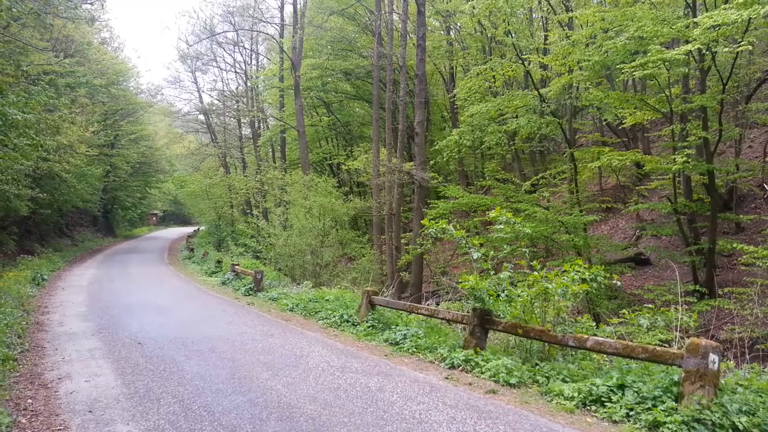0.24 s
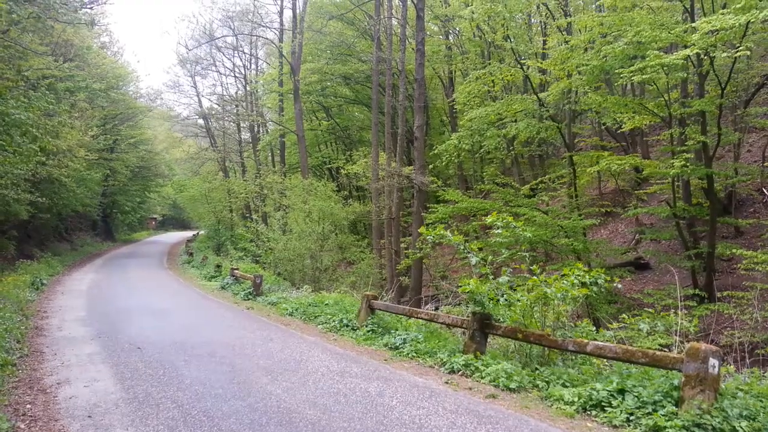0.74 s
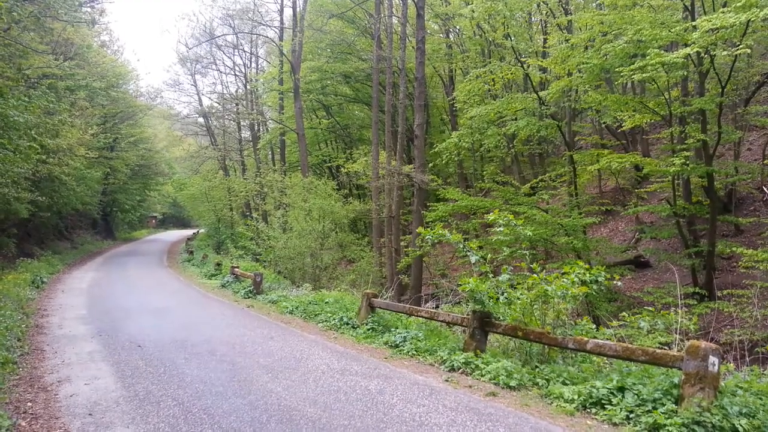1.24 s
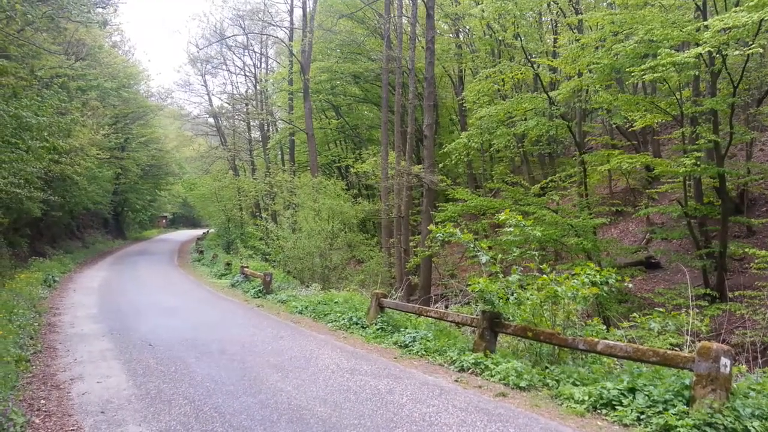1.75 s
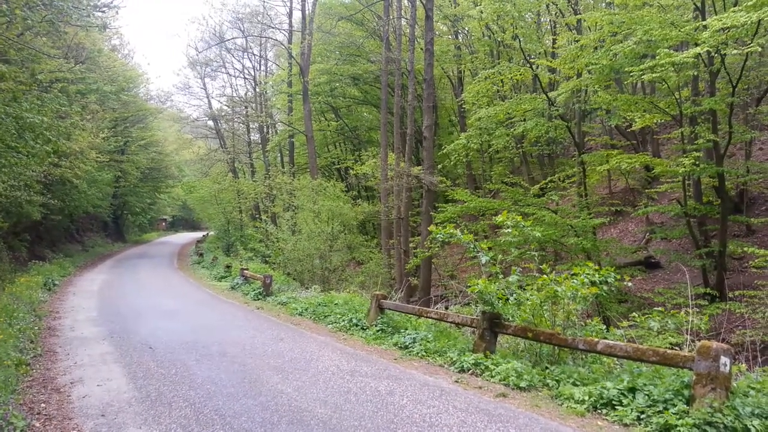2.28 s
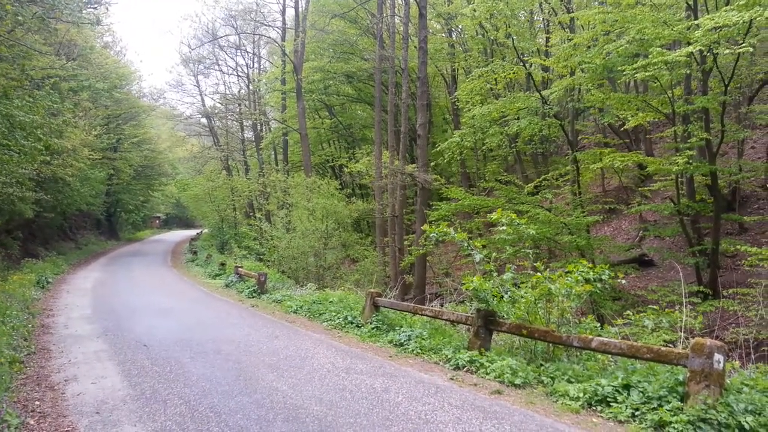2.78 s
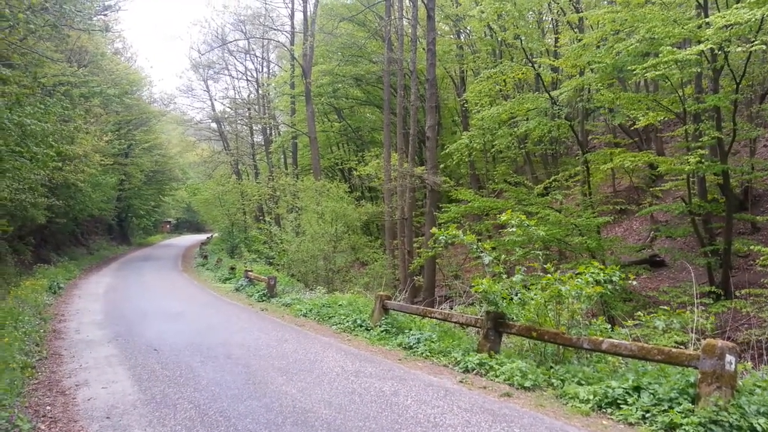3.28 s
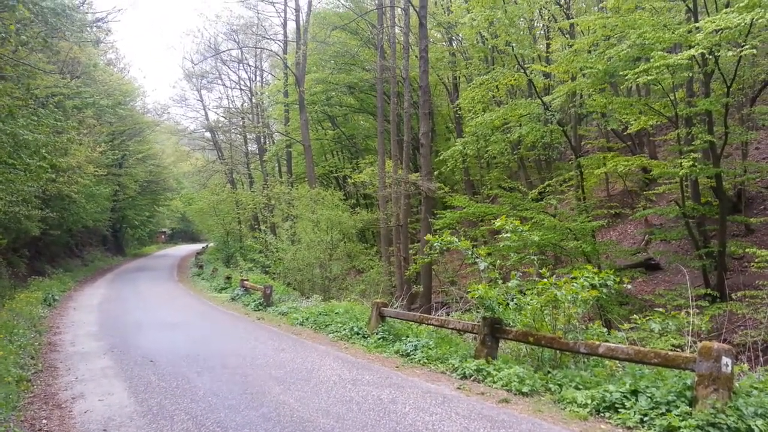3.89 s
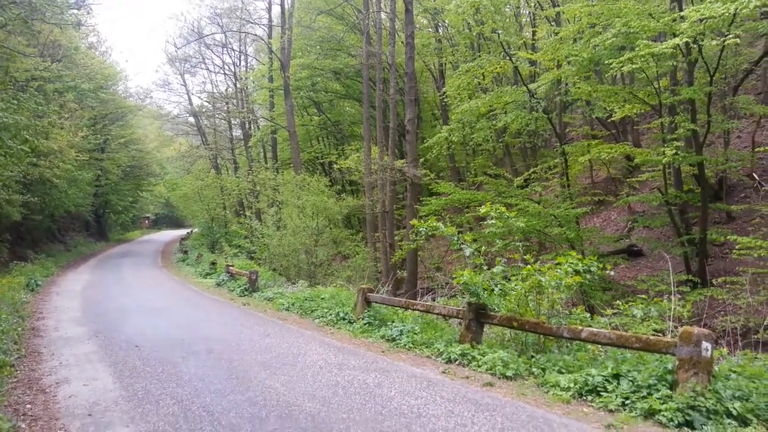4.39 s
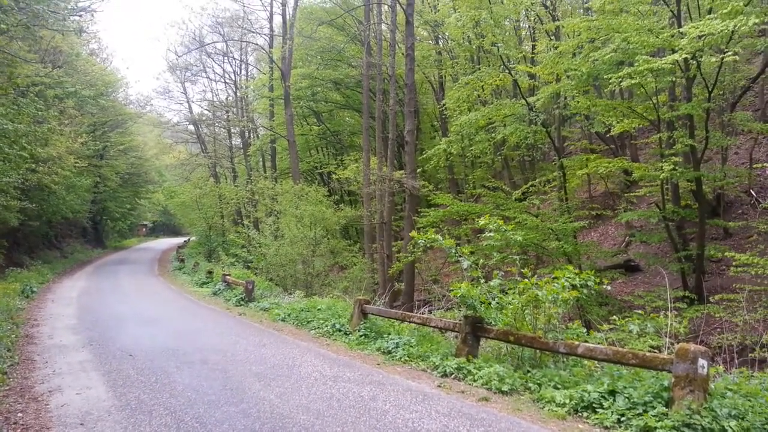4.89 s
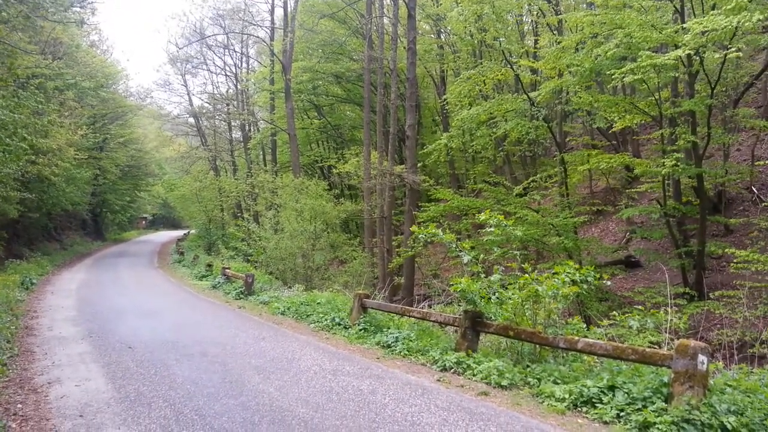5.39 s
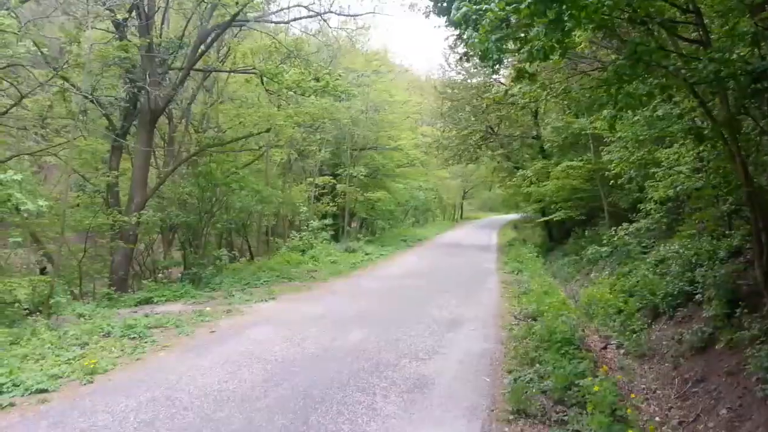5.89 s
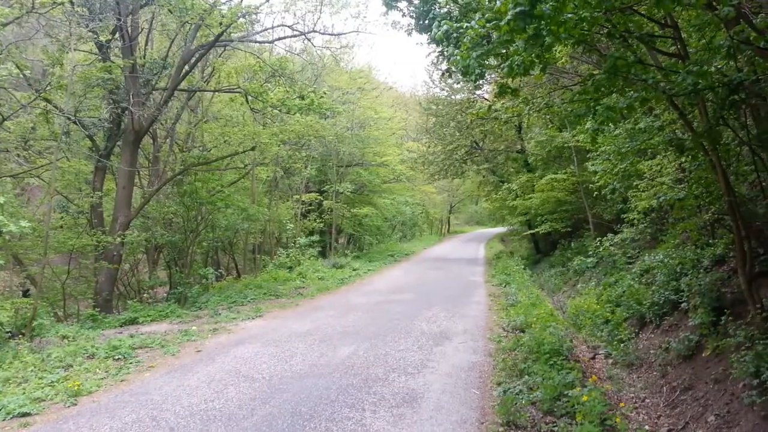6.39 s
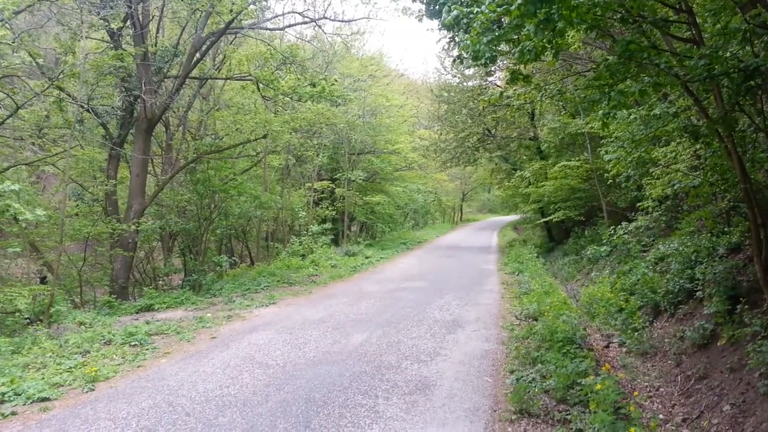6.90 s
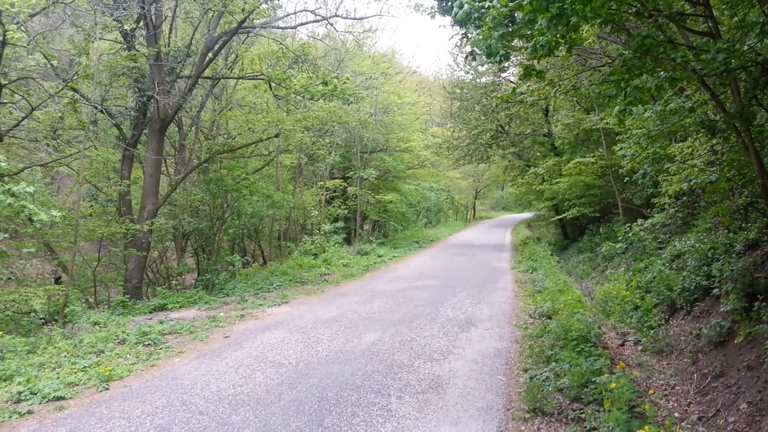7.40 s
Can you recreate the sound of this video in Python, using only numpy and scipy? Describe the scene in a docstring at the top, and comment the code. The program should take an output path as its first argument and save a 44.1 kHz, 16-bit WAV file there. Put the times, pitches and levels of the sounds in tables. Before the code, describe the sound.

Songbirds call in a leafy wood: fluted notes, thin whistles, quick slurs and short buzzes, each echoing off trunks, with distant twittering behind. Low wind buffets a stereo camera microphone, mainly on the right, thumping hardest around 2.4 seconds and puffing again from about 4 to 5.8. A sharp tick clicks at 4.7. Near song cuts off abruptly at 5.8, then sparser calls continue over quiet hiss.

```python
"""Songbirds in spring woodland

Near birds sing fluted notes, thin whistles, slurs, chips and buzzes: gliding tones with echoes off trunks.
Nearer song breaks off at 5.805 s, echoes included; later notes follow. Far twitter is echo alone.
Wind puffs are churning low noise, mostly in the right port; the camera ticks, hisses and whines faintly.
Behind lie soft knocks, a noise murmur of far leaves and a low rumble."""
import sys
import numpy as np
from scipy import signal
from scipy.fft import rfft, irfft, next_fast_len
from scipy.io import wavfile
from scipy.ndimage import uniform_filter1d, map_coordinates

SR = 44100
rng = np.random.default_rng(int(sys.argv[2]) if len(sys.argv) > 2 else 0)


def file_out(sig):
    """Save sig as 16-bit WAV at sys.argv[1]."""
    # one column per channel
    cols = np.atleast_2d(sig).T
    # limit, then scale
    lim = np.clip(cols, -1, 1)
    pcm = np.round(lim * 32767).astype(np.int16)
    wavfile.write(sys.argv[1], SR, pcm)


N = 337365
T = np.arange(N) / SR


# pan_db throughout: left minus right level
def amp(db):
    """Decibels to gain."""
    return 10 ** (np.asarray(db) / 20)


def unit(x):
    """Scale to rms 1."""
    return x / np.sqrt(np.mean(x ** 2) + 1e-20)


def along(points, hz):
    """Interpolate (freq_hz, value) points on a log frequency axis."""
    point_hz, values = np.transpose(points)
    return np.interp(np.log(hz + 1), np.log(point_hz + 1), values)


def curve(rows):
    """Interpolate (time_s, value) rows to one value per sample."""
    time_s, values = np.transpose(rows)
    return np.interp(T, time_s, values)


def wobble(knots_per_s, size=N):
    """Smooth random curve through Gaussian knots."""
    knots = rng.standard_normal(int(size * knots_per_s / SR) + 4)
    return map_coordinates(knots, [np.arange(size) * knots_per_s / SR])


def filtered(x, response):
    """Multiply the spectrum of x by a function of frequency."""
    m = next_fast_len(N + SR // 4)
    spectrum = rfft(x, m) * response(np.fft.rfftfreq(m, 1 / SR))
    return irfft(spectrum, m)[..., :N]


def noise(spectrum):
    """Coloured noise of rms 1."""
    return unit(filtered(rng.standard_normal(N), lambda hz: amp(along(spectrum, hz))))


def rush(spectrum):
    """Stereo coloured noise of rms 1; the channels correlate mainly in the bass."""
    # left-right likeness: freq_hz, correlation
    likeness = [(60, 0.66), (150, 0.59), (380, 0.53), (940, 0.17), (2370, 0.034), (5930, 0.027),
                (14800, 0.03)]

    def mid_side(hz):
        angle_rad = np.arccos(np.clip(along(likeness, hz), -1, 1)) / 2
        return amp(along(spectrum, hz)) * [np.cos(angle_rad), np.sin(angle_rad)]

    mid, side = filtered(rng.standard_normal((2, N)), mid_side)
    return unit(np.array([mid + side, mid - side]))


def panned(pan_db):
    """Left and right gains for a level difference, at constant power."""
    return unit(amp([[pan_db / 2], [-pan_db / 2]]))


def add(track, start_s, sound):
    """Mix a sound into a stereo track."""
    i = max(0, round(start_s * SR))
    track[:, i:i + sound.shape[1]] += sound[:, :N - i]


def birds():
    """Nearer birds; notes begun before the break, and their echoes, fade out there in 3.3 ms."""
    break_s, fade_s = 5.805, 0.0033
    first, second = np.zeros((2, 2, N))
    for start_s, sound in songs():
        add(first if start_s < break_s else second, start_s, sound)
    return first * np.clip((break_s - T) / fade_s, 0, 1) + second


def songs():
    """Every note of the nearer birds; each kind of call has one pitch shape."""
    # level_db is relative; echo_db is against the direct note
    # low notes: start_s, length_s, opening_hz, held_hz, trill_hz, level_db, pan_db, echo_db
    fluted = [(0.412, 0.12, 2060, 2058, 5, -54.5, -3, -1.5), (0.778, 0.1, 2360, 2323, 0, -61, -4, -3),
              (0.825, .06, 2217, 2070, 50, -58, -2, 3), (1.229, 0.15, 2350, 2266, 0, -62, -6, 4),
              (1.3, .18, 2704, 2630, 0, -65, 5, 6), (1.874, .096, 1635, 1700, 5, -56, 9, -3),
              (2.08, .082, 2280, 2115, -1, -51, 9, -12), (2.14, .075, 2100, 1953, 0, -47.5, 12, -1),
              (2.221, .079, 2004, 1900, 118, -52.5, 5, -1), (2.358, 0.064, 2800, 2680, -5, -49, 7, -4),
              (2.387, 0.131, 2600, 2570, 142, -48, -0.5, 2), (2.524, 0.083, 1770, 2124, 33, -42.5, -4, 1),
              (2.828, 0.078, 1698, 2494, 190, -54.5, -7, 2), (3.17, 0.092, 2560, 2590, 50, -57, -5, 4),
              (5.52, 0.11, 1753, 1865, 0, -54.5, -19, -1.5), (5.81, 0.054, 2670, 2630, 0, -50, -1.5, -1.5),
              (5.985, 0.047, 2320, 2329, 14, -39.5, 1, -3.5), (6.118, 0.085, 2660, 2610, 20, -57.5, -1, -6)]
    for start_s, length_s, opening_hz, hz, trill_hz, db, pan_db, echo_db in fluted:
        yield sing(start_s, length_s, (opening_hz, hz, hz), db, pan_db, echo_db, trill_hz, settle_s=0.01395)

    # steady whistles, opening 2.5 % flat: start_s, length_s, held_hz, level_db, pan_db
    thin = [(0.111, 0.076, 4300, -56, 1.5), (1.176, .066, 5270, -61, 4), (2.25, 0.17, 5530, -56.5, 0),
            (3.185, 0.076, 6570, -46.5, -19), (3.201, 0.059, 5060, -54, 10), (3.595, .15, 4980, -56.5, 12),
            (6.464, 0.064, 4340, -58, 2), (6.99, 0.21, 3233, -67, -0.5), (7.219, 0.14, 5000, -57.5, 6)]
    for start_s, length_s, hz, db, pan_db in thin:
        yield sing(start_s, length_s, (hz * (1 - 0.025), hz, hz), db, pan_db, echo_db=2)

    # glides up or down: start_s, length_s, from_hz, to_hz, level_db, pan_db
    slurs = [(1.36, 0.11, 8170, 7560, -61.5, -10), (2.722, 0.038, 6700, 4820, -51, -1),
             (2.732, .05, 8260, 3810, -46.5, -7), (2.752, 0.036, 7900, 6060, -48, -12),
             (2.765, .035, 4330, 3850, -49, 10), (3.265, .15, 6770, 7130, -57, -15),
             (3.532, 0.063, 3540, 4930, -54.5, 12), (3.538, .16, 6960, 6300, -54.5, -13.5),
             (5.716, 0.078, 2605, 2200, -48.5, -14), (7.294, .048, 4980, 4460, -48.5, 5.5)]
    for start_s, length_s, from_hz, to_hz, db, pan_db in slurs:
        yield glide(start_s, length_s, from_hz, to_hz, db, pan_db, echo_db=0.5)

    # very high calls, opening 520 Hz sharp: start_s, length_s, held_hz, level_db, pan_db
    seeps = [(0.145, 0.097, 8390, -46, -5.5), (3.742, 0.09, 8310, -43, -15), (6.58, 0.12, 8200, -64, -10)]
    for start_s, length_s, hz, db, pan_db in seeps:
        yield sing(start_s, length_s, (hz + 520, hz, hz), db, pan_db, echo_db=1, trill_hz=40, settle_s=0.0123)

    # "tu-wee", a high flick then a scoop onto one pitch: start_s, level_db
    tuwees = [(1.228, -46), (1.428, -46)]
    flick_lead_s, flick_s, flick_db = 0.018, 0.024, -9
    for start_s, db in tuwees:
        yield glide(start_s - flick_lead_s, flick_s, 5700, 6900, db + flick_db, pan_db=-9, echo_db=-7)
        yield sing(start_s, 0.085, (3585, 4410, 4410), db, pan_db=-1.0, echo_db=-0.5, settle_s=0.006)

    # trills fast enough to buzz: start_s, level_db
    buzzes = [(3.751, -48), (5.624, -49)]
    for start_s, db in buzzes:
        yield sing(start_s, 0.19, (3720, 3720, 3720), db, pan_db=1.0, echo_db=3.5, trill_hz=284)

    # short falling chips: start_s, level_db
    chips = [(3.769, -48), (3.845, -50), (4.03, -51)]
    for start_s, db in chips:
        yield glide(start_s, 0.023, 7250, 6370, db, pan_db=-19.0, echo_db=-1.5)


def glide(start_s, length_s, from_hz, to_hz, db, pan_db, echo_db):
    """A note that slides all along; the wider the slide, the deeper its trill."""
    pitches_hz = (from_hz, (from_hz + to_hz) / 2, to_hz)
    trill_hz = 0.045 * abs(to_hz - from_hz)
    return sing(start_s, length_s, pitches_hz, db, pan_db, echo_db, trill_hz, settle_s=0.35 * length_s)


def sing(start_s, length_s, pitches_hz, db, pan_db, echo_db, trill_hz=0, settle_s=0.0155):
    """One note (opening, held, closing), direct and echoed by trees: (start_s, stereo sound)."""
    edge = 0.21 + trill_hz / 700  # deep trills swell in more slowly
    note = syrinx(length_s, *pitches_hz, trill_hz, trill_rate_hz=85, waver=0.0053, edge=edge, settle_s=settle_s)
    energy = np.linalg.norm(note)
    echo = signal.fftconvolve(note[None], trunks(pitches_hz[1], near_db=0.0, near_t60_s=0.19), axes=1)
    heard = amp(echo_db) * energy * echo / np.linalg.norm(echo, axis=1, keepdims=True)
    # right-channel lag: on average the louder side leads, with random scatter
    lag_samples = round(0.6 * pan_db) + rng.integers(-4, 5)
    heard[:, :len(note)] += np.array([note, np.roll(note, lag_samples)])
    heard *= energy / np.linalg.norm(heard, axis=1, keepdims=True)
    return start_s, amp(db + 1.0) * heard * panned(pan_db)


def syrinx(length_s, opening_hz, held_hz, closing_hz, trill_hz, trill_rate_hz, waver, edge, settle_s):
    """A pure tone settles exponentially onto its pitch, then slides away; deep trilling roughens it."""
    t = np.arange(int(length_s * SR)) / SR
    size = len(t)
    u = t / length_s
    pitch_hz = held_hz + (opening_hz - held_hz) * np.exp(-t / settle_s) + (closing_hz - held_hz) * u ** 3
    rate_hz = trill_rate_hz * (1 + 0.296 * wobble(90, size))
    trill = np.sin(2 * np.pi * np.cumsum(rate_hz) / SR)
    pitch_hz = pitch_hz * (1 + waver * wobble(116.5, size))
    pitch_hz = pitch_hz + trill_hz * (1 + 0.26 * wobble(150, size)) * trill
    swell = np.sin(np.pi / 2 * np.clip(np.minimum(u, 3.4 * (1 - u)) / edge, 0, 1))
    envelope = unit(swell * amp(1.4 * wobble(73, size)))
    return envelope * np.sin(2 * np.pi * np.cumsum(pitch_hz) / SR)


def trunks(hz, near_db, near_t60_s):
    """Fresh stereo noise echo: quick scatter from near trees plus the long tail of the wood."""
    # long tail: freq_hz, t60_s
    wood = [(1500, 0.52), (2500, 0.99), (4500, 0.79), (8500, 0.43)]
    t = np.arange(int(SR * 0.7)) / SR
    fade = amp(-60 * t / along(wood, hz)) + amp(near_db - 60 * t / near_t60_s)
    onset = 1 - np.exp(-t / 0.0085)
    tail = rng.standard_normal((2, len(t))) * fade * onset
    return tail / np.linalg.norm(tail[0])


def chorus(count, db):
    """Twittering deep in the wood: random gliding notes heard only as echoes."""
    out = np.zeros((2, N))
    for when, height, slide, span in rng.random((count, 4)):
        hz = 1600 * 3.6 ** height
        bend_hz = 0.298 * (slide - 0.5) * hz
        note = syrinx(0.05 + 0.1 * span, hz + bend_hz, hz, hz - bend_hz, trill_hz=165, trill_rate_hz=53,
                      waver=0.015, edge=0.5, settle_s=0.025)
        echo = signal.fftconvolve(note[None], trunks(hz, near_db=-14, near_t60_s=0.18), axes=1)
        add(out, when * T[-1], amp(db) * echo)
    return out


def wind():
    """Puffs (low noise) and single eddies (brief low pulses) press mostly on the right port."""
    # breezy spells and the puffs: start_s, hold_s, strength_db (relative)
    spells = [(2.25, .54, -59), (3.88, 1.9, -60.5)]
    puffs = [(2.315, 0.14, -42.5), (2.48, 0.11, -44.5), (2.66, .08, -47), (3.925, 0.024, -48.5),
             (4.01, 0.027, -51), (4.145, 0.072, -45.5), (4.44, 0.11, -45.5), (4.575, 0.04, -40.5),
             (4.725, .04, -46.5), (4.828, 0.024, -44), (4.995, 0.026, -50.5), (5.14, 0.058, -40),
             (5.28, 0.052, -44), (5.505, 0.081, -42.5), (5.665, .11, -42)]
    # buffeting spectrum: freq_hz, level_db (relative)
    buffet = [(15, -19), (35, -21), (60, 1.5), (100, 4), (160, -7), (230, -16), (350, -31.5), (700, -59),
              (2000, -82)]
    # single eddies: centre_s, right_peak_db, pitch_hz
    thumps = [(.78, -40.5, 90), (1.905, -42.5, 90), (2.12, -39, 108), (2.324, -26.5, 93), (2.394, -25, 101),
              (2.411, -13, 163), (7.28, -46, 98.7)]
    strength = np.max([blow(*row) for row in list(spells) + list(puffs)], axis=0)
    eddies = np.array([noise(buffet), noise(buffet)])
    power = uniform_filter1d(eddies ** 2, int(0.046 * SR), axis=1)
    eddies /= np.sqrt(np.abs(power) + 1e-6)  # even churning within a puff
    ports = strength * eddies * amp([[-14], [5]])
    t = np.arange(-SR // 20, SR // 20) / SR
    for centre_s, db, hz in thumps:
        push = np.cos(2 * np.pi * hz * t) / np.cosh(np.pi * hz * t)
        add(ports, centre_s + t[0], amp(db) * push * amp([[-32], [0]]))
    return ports


def blow(start_s, hold_s, db):
    """Strength of moving air: exponential rise up to start_s, hold, exponential decay."""
    attack_s, release_s = 0.013, 0.018
    before_s = np.maximum(start_s - T, 0)
    after_s = np.maximum(T - start_s - hold_s, 0)
    return amp(db) * np.exp(-before_s / attack_s - after_s / release_s)


def ticks():
    """Each tick is a snap of a few cycles in the camera shell, a bright edge and a weak short ring."""
    # ticks: centre_s, level_db (relative), pan_db, ring_hz, ring_width_hz
    tick_rows = [(3.9936, -33, 8, 11000, 7000), (4.1113, -31, -3, 5500, 6000),
                 (4.2398, -34, 8, 11000, 7000), (4.2832, -31, 10, 10500, 4970),
                 (4.284, -30.5, -3, 5400, 1600), (4.6668, -6, 6, 5700, 2630), (5.2327, -31, -1, 6000, 5000),
                 (5.556, -35.5, -7, 6000, 5000), (5.6832, -30.5, 9, 10000, 9000),
                 (6.3684, -33.5, -4, 6740, 2950)]
    out = np.zeros((2, N))
    t = np.arange(-SR // 500, SR // 50) / SR
    for centre_s, db, pan_db, hz, width_hz in tick_rows:
        snap = np.exp(-(2.18 * width_hz * t) ** 2) + (t > 0) * amp(-7 - 60 * np.abs(t) / 0.00038)
        shell = snap * np.sin(2 * np.pi * hz * t + np.array([[0], [np.pi / 2]]))
        edge = amp(-19.5) * np.exp(-(5000 * t) ** 2) * np.cos(2 * np.pi * 12000 * t)
        body = (t > 0) * amp(-37 - 60 * np.abs(t) / 0.0085) * np.sin(2 * np.pi * 2200 * t)
        add(out, centre_s + t[0], amp(db + 1.5) * panned(pan_db) * (shell + edge + body))
    return out


def knocks():
    """Soft far knocks: a short hollow ring, blurred by the trees."""
    # knocks: start_s, peak_db, pitch_hz
    knock_rows = [(2.3, -51, 613), (2.825, -41.5, 672), (7.06, -52, 560)]
    out = np.zeros((2, N))
    t = np.arange(SR // 10) / SR
    for start_s, db, hz in knock_rows:
        ring = amp(-60 * t / 0.039) * np.sin(2 * np.pi * hz * t)
        blurred = signal.fftconvolve(ring[None], trunks(hz, near_db=30, near_t60_s=0.077), axes=1)
        add(out, start_s, amp(db) * blurred / np.abs(blurred).max())
    return out


def woodland():
    """Far leaves and a low distant rumble: coloured noise drifting in level."""
    # leaf murmur and rumble levels: time_s, level_db (relative)
    air = [(0.0, -62.5), (0.62, -65), (0.96, -63), (1.96, -63), (2.24, -59), (2.73, -57), (2.94, -61.5),
           (4.88, -60.5), (5.32, -61), (5.65, -59), (5.8, -61.5), (6.75, -68), (7.22, -66), (7.65, -67)]
    drone = [(0, -61), (1, -60.5), (1.35, -56), (1.8, -59.5), (2.6, -57.5), (3.1, -64), (5.9, -62.5),
             (7.65, -66.5)]
    # their spectra: freq_hz, level_db (relative)
    murmur_spectrum = [(100, -32), (250, -0.5), (400, -2.5), (700, -1), (1200, -2.5), (1900, -3.5),
                       (3000, -7), (4400, -9), (6000, -7.5), (9000, -20), (14000, -44)]
    rumble_spectrum = [(15, -26), (30, -9.5), (55, -3), (110, 0.5), (170, -1), (240, -2.5), (310, -6.5),
                       (500, -22), (1200, -49)]
    murmur_db = curve(air) + 6.5 + 1.16 * wobble(9)
    rumble_db = curve(drone) + 0.63 * wobble(7.3)
    murmur = amp(murmur_db) * rush(murmur_spectrum) * panned(0.77)
    return murmur + amp(rumble_db) * rush(rumble_spectrum)


def electronics():
    """Microphone hiss, treble-peaked on the right, and an electrical buzz: low hum and wavering whine."""
    # common level of hiss, whine and hum: time_s, level_db (relative)
    hiss_levels = [(0.0, -64.5), (0.94, -67.5), (1.45, -64.5), (1.79, -67), (2.79, -63), (3.86, -66.5),
                   (4.37, -65), (5.45, -65.5), (5.99, -66), (6.82, -68), (7.65, -68.5)]
    # hiss spectra: freq_hz, level_db (relative)
    hiss_left = [(1000, -17), (3000, -3.5), (4500, 8.5), (6500, -2), (8500, -1.5), (11000, -0.5),
                 (14500, -1.5)]
    hiss_right = [(1000, -27), (3500, 3.5), (5200, 3), (6200, 13.5), (6700, 16), (7300, 12), (8200, 5.5),
                  (10500, 4.5), (14500, -2.5)]
    # whine line levels: freq_hz, level_db (relative)
    whine_levels = [(8000, -15), (8900, -1.5), (10600, 2.5), (11400, -11), (12200, -6.5), (14400, -4)]
    # hum lines: multiple of pulse_hz, level_db (against the common level)
    hum_lines = [(1, -4), (2, -9.5), (3, -9.5)]
    pulse_hz = 216.67

    def line(multiple):
        return np.sin(2 * np.pi * (multiple * pulse_hz * T + rng.random()))

    hiss = np.array([amp(6) * noise(hiss_left), amp(11.0) * noise(hiss_right)])
    lines = sum(amp(along(whine_levels, k * pulse_hz)) * line(k) for k in range(40, 66))
    whine = unit(lines * amp(3.6 * wobble(12))) * amp([[-10], [-1]])
    hum = sum(amp(db) * line(k) for k, db in hum_lines) * amp(1.1 * wobble(4))
    return amp(curve(hiss_levels)) * (hiss + whine + hum)


def scene():
    """Sum of all sources at the two ports."""
    return birds() + chorus(count=34, db=-64.5) + wind() + ticks() + knocks() + woodland() + electronics()


def record(dry):
    """The camera keeps nothing above its band limit."""
    top_hz = 14550
    return filtered(dry, lambda hz: hz < top_hz)


dry = scene()
out = record(dry)
file_out(out)
```